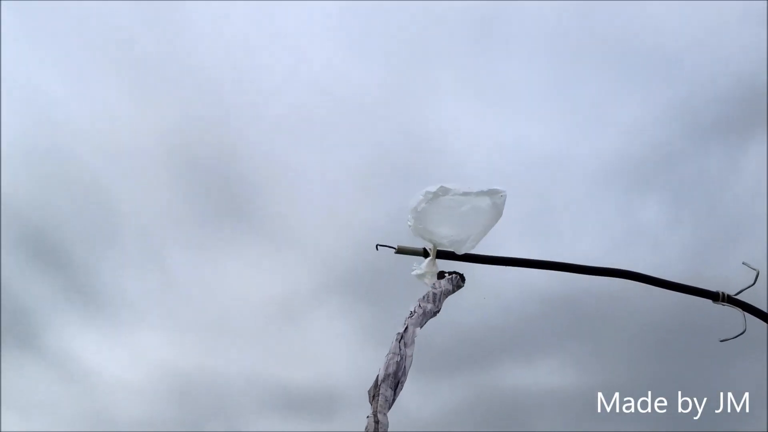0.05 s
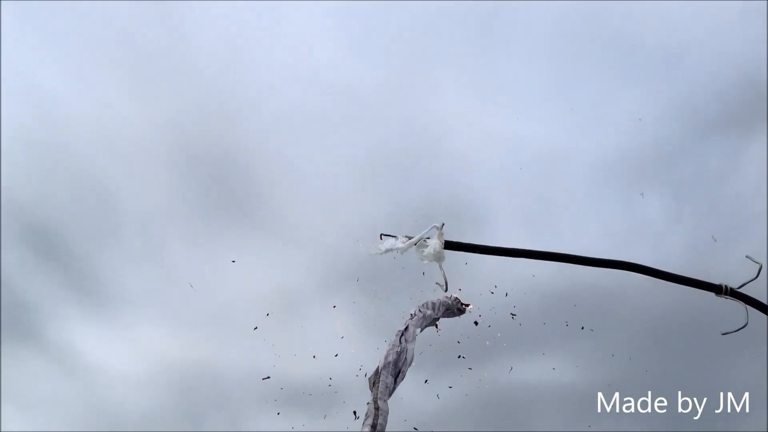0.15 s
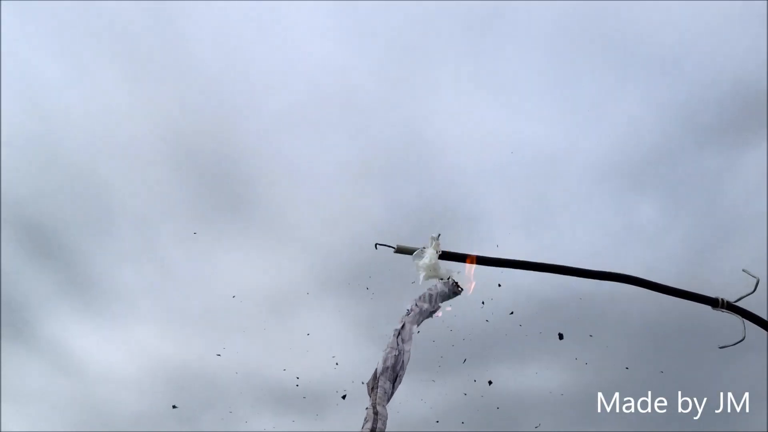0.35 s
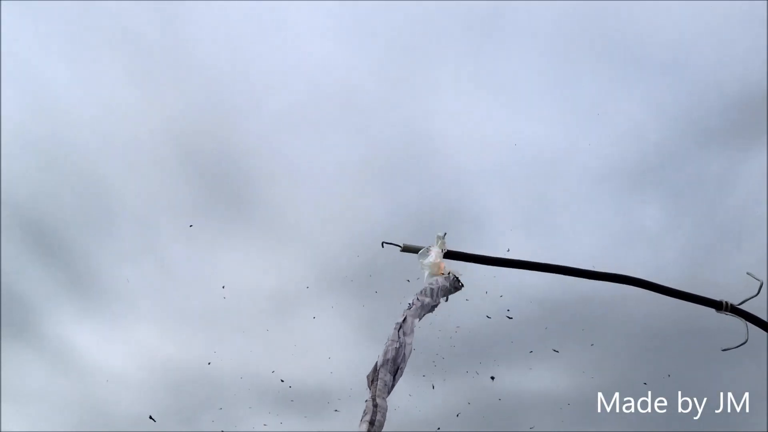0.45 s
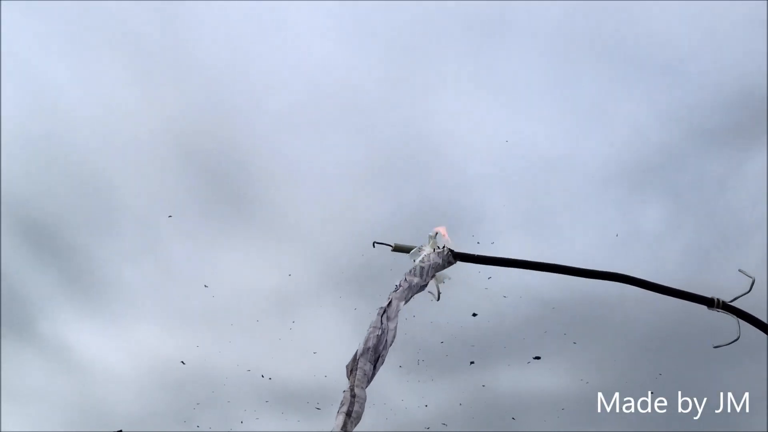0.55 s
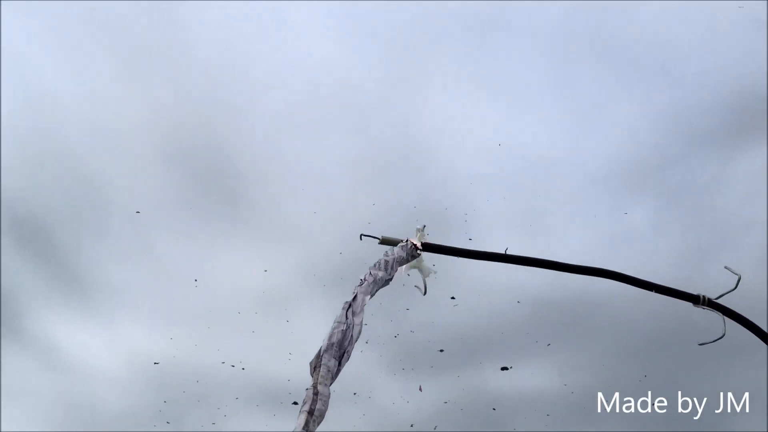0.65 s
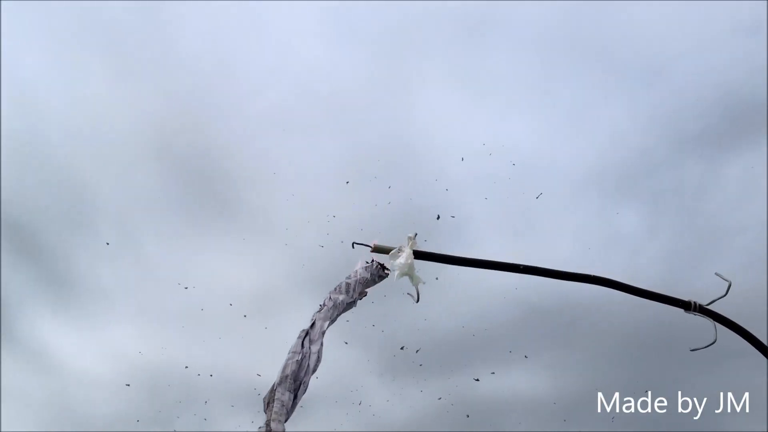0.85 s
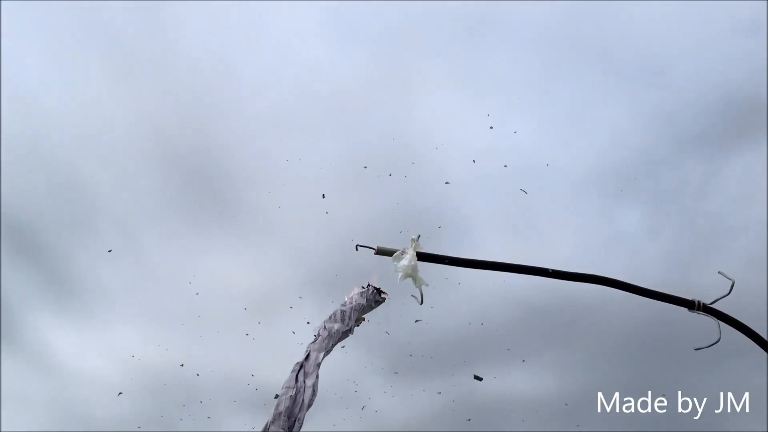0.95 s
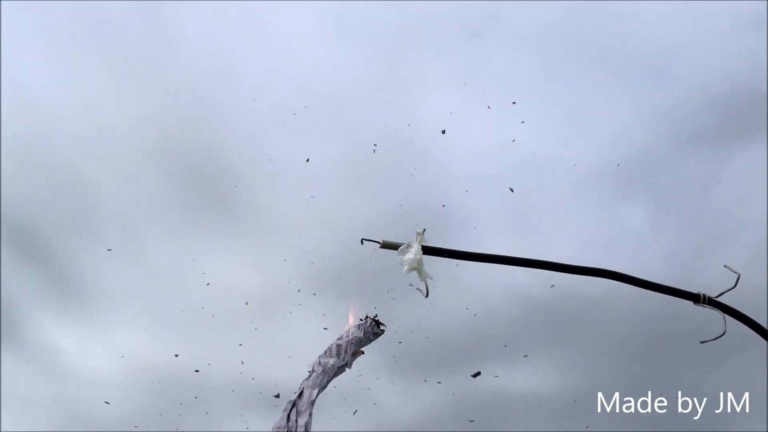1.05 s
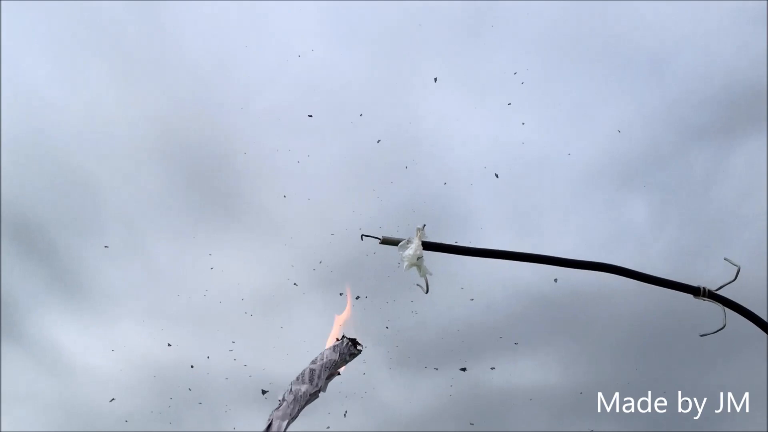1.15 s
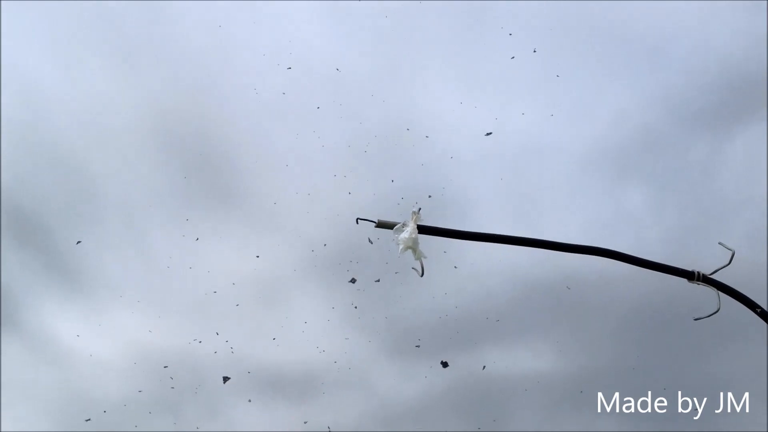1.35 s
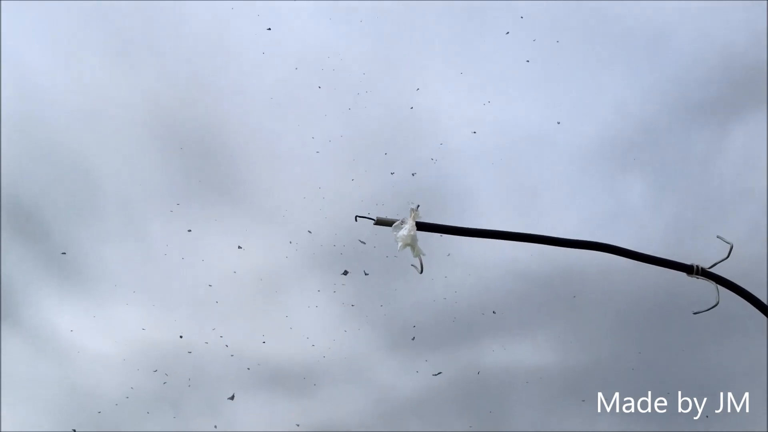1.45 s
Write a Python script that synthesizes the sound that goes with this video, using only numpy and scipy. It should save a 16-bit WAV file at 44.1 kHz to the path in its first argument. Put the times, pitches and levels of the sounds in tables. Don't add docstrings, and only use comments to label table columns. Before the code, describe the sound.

A gas balloon bursts with one very loud, sharp bang at 0.21 s, preceded by quiet torch hiss, ticks and airy puffs, the strongest knock near 0.10. Close reflections crowd the first 50 ms; a low thump follows at 0.37. Thin wall echoes flutter from 0.30 to 0.8, weakening over a diffuse rumble. Tiny metal tinks sound around 0.55-0.69 and 0.98; faint distant town hum remains. Boxy microphone, rounded peaks.

```python
import sys
import numpy as np
from scipy import signal
from scipy.io import wavfile
from scipy.ndimage import uniform_filter1d

SR = 44100
rng = np.random.default_rng(int(sys.argv[2]) if len(sys.argv) > 2 else 0)


def unload_wav(signal):
    wavfile.write(
        sys.argv[1],
        SR,
        np.round(np.clip(np.atleast_2d(signal).T, -1, 1) * 32767).astype(np.int16),
    )


def gain_from_db(level_db):
    decades = np.asarray(level_db, float) / 20
    return 10 ** decades


N = 66150
BURST_S = .2140


def band(x, hz, width):
    return signal.lfilter(*signal.iirpeak(min(hz, .45 * SR), hz / width, fs=SR), x)


def noise_band(hz, width):
    return unit(band(band(rng.standard_normal(N), hz, width), hz, width))


def cut(x, hz, kind, order=2):
    return signal.sosfilt(signal.butter(order, min(hz, .45 * SR), kind, fs=SR, output="sos"), x)


def unit(x):
    return x / np.sqrt(np.mean(x ** 2))


def walk(rate):
    k = int(SR / rate)
    steps = np.repeat(rng.standard_normal(N // k + 1), k)
    return unit(uniform_filter1d(uniform_filter1d(steps, k), k)[:N])


def fade(t, rise_s, fall_s):
    u = np.maximum(t, 0)
    return (1 - np.exp(-u / rise_s)) * np.exp(-u / fall_s)


def torch(t):
    # (time [s], level [dB], centre [Hz], length [s])
    puffs = [
        (.006, -74, 7000, .003),
        (.056, -57.5, 5300, .008),
        (.098, -62, 8000, .003),
        (.102, -49.5, 1850, .01),
        (.122, -54, 6000, .003),
        (.148, -55, 6950, .004),
        (.153, -54.5, 2500, .012),
        (.173, -83, 8000, .002),
        (.201, -60, 4980, .002),
        (1.395, -68, 5000, .003),
    ]
    level_db, centre_hz, flicker_db = -66.5, 3300, 1.5
    flicker = gain_from_db(level_db + flicker_db * walk(210))
    burning = np.clip((BURST_S - t) / .002, 0, 1)
    out = flicker * unit(band(rng.standard_normal(N), centre_hz, 7000)) * burning
    for s, db, hz, length_s in puffs:
        out = out + gain_from_db(db) * fade(t - s, .0008, length_s) * noise_band(hz, 2.6 * hz)
    return out


def air(t):
    # (frequency [Hz], level per third octave [dB])
    town = np.array([(40, -79.5), (100, -78), (220, -70), (600, -71), (1400, -81), (3000, -88.5),
                     (9000, -88.5), (14000, -84)])
    # (frequency [Hz], early level [dB], early t60 [s], late level [dB], late t60 [s])
    tail = np.array([(60, -37, 0.47, -52.5, .8), (150, -19.5, 0.27, -47.5, 1.67),
                     (300, -25.5, 0.55, -42.5, 1.58), (684.5, -24, 0.13, -47, 1.7),
                     (1500, -27.5, 0.14, -52, 1.46), (4000, -30, 0.083, -49, .8), (8000, -43, .2, -52, 0.4),
                     (14000, -54, 0.24, -60, 0.55)])
    rise_s, patchy_db, hum_before_db = .007, 1.2, 4.0
    since = t - BURST_S
    lumps = gain_from_db(patchy_db * walk(90))
    duck = gain_from_db(hum_before_db * np.clip(-since / .002, 0, 1))
    out = 0
    for hz in 40 * 2 ** (np.arange(27) / 3):
        early_db, early_t60, late_db, late_t60 = (
            np.interp(np.log(hz), np.log(tail[:, 0]), tail[:, k]) for k in range(1, 5))
        early = gain_from_db(early_db) * fade(since, rise_s, early_t60 / np.log(1000))
        late = gain_from_db(late_db) * fade(since, rise_s, late_t60 / np.log(1000))
        hum = gain_from_db(np.interp(np.log(hz), np.log(town[:, 0]), town[:, 1])) * duck
        level = np.hypot((early + late) * lumps, hum)
        level = level * gain_from_db(0.5 * walk(min(hz / 8, 30)))
        out = out + level * noise_band(hz, hz / 3)
    return out


def half_sine(u, length_s):
    return np.sin(np.pi * np.clip(u / length_s, 0, 1))


def blast(t):
    # (time [s], level [dB], length factor [1], tearing level [dB])
    arrivals = [(.2140, 1, 1.2, -1), (.2168, 4, 1.6, -10), (.2182, 2, .45, -5), (.2188, 5, .95, -12),
                (.2214, -10, 2.1, -10), (.2233, -6, .6, -12), (.2247, -4, 1.1, -13), (.2257, -9, .6, -20),
                (.2265, -8, 1.1, -30), (.2340, -14, 1.2, -22), (.2365, -14, 1.2, -22),
                (.2399, -8, 1.6, -20), (.2445, -9, 1.6, -20), (.2632, -9, 1.5, -20)]
    level_db, push_s, suck_s, suck_share = -4, .0008, .0016, .8
    tear_gain_db, tear_delay_s, tear_s = 3, .0007, .0009
    out = 0
    for s, db, stretch, tear_db in arrivals:
        u = t - s
        push = half_sine(u, push_s * stretch)
        suck = half_sine(u - push_s * stretch, suck_s * stretch)
        tear = rng.standard_normal(N) * fade(u - tear_delay_s * stretch, tear_s / 2, tear_s)
        out = out + gain_from_db(db) * (push - suck_share * suck) + gain_from_db(tear_db + tear_gain_db) * tear
    return gain_from_db(level_db) * cut(out, 9000, "low")


def rough_returns(t):
    # (peak time [s], level [dB], spread [s], centre [Hz])
    returns = [
        (0.241, -33, 0.002, 4200),
        (.261, -36.5, 0.0047, 4740),
        (0.268, -28.5, 0.014, 200),
        (0.334, -31, 0.002, 600),
        (0.368, -26, 0.0037, 238),
        (0.439, -38.5, 0.0017, 468),
        (0.549, -43, 0.016, 300),
        (1.215, -52.5, 0.0057, 500),
        (1.018, -57.5, 0.0015, 900),
    ]
    out = 0
    for s, db, spread_s, hz in returns:
        swell = np.exp(-.5 * ((t - s) / spread_s) ** 2)
        out = out + gain_from_db(db) * swell * noise_band(hz, 0.72 * hz)
    return out * (t > BURST_S)


def flutter(t):
    # (time [s], level [dB], bottom [Hz], top [Hz])
    echoes = [(0.2993, -27, 1000, 2380), (0.3112, -27, 1100, 8000), (0.3622, -30, 1140, 9000),
              (0.4113, -43, 1400, 8400), (.437, -46, 900, 2000), (0.4598, -43.5, 1500, 5640),
              (0.5124, -44, 1500, 4700), (0.5623, -57, 2500, 6540), (0.612, -56.5, 2550, 4400),
              (0.6612, -58, 3000, 4300), (0.7604, -65, 3000, 4360), (.810, -65, 3320, 6290)]
    level_db, rise_s, fall_s = -2.5, 0.00039, 0.0019
    trail_db, trail_s = -14, 0.0046
    out = 0
    for s, db, low_hz, high_hz in echoes:
        u = t - s
        trail = gain_from_db(trail_db) * fade(u + 0.0028, 0.00097, trail_s)
        crack = rng.standard_normal(N) * (fade(u, rise_s, fall_s) + trail)
        crack = cut(crack, 1800, "low", order=1)
        crack = cut(crack, low_hz, "high", order=3)
        crack = cut(crack, high_hz, "low", order=4)
        out = out + gain_from_db(db) * unit(crack)
    return gain_from_db(level_db) * out * np.sqrt(fall_s * SR / N)


def metal(t):
    # (time [s], level [dB], brightness [dB])
    tinks = [
        (.547, -67.5, 15.5),
        (0.5506, -61, -14),
        (0.647, -73.5, 14),
        (.687, -64.5, 1),
        (.9775, -67.5, 1.5),
    ]
    # (frequency [Hz], level [dB], t60 [s])
    modes = [(7070, -8, .11), (7550, -3, 0.15), (8200, -10, 0.034), (9640, -4.5, .07), (11400, -16, .05),
             (11860, -17, 0.038), (13100, -28, 0.044)]
    tap_db, tap_s, waver_db = -10, .003, 2.5
    out = 0
    for s, db, bright_db in tinks:
        u = t - s
        phase = rng.uniform(0, 2 * np.pi, len(modes))
        tap = fade(u, 0.00045, tap_s) * unit(band(rng.standard_normal(N), 6460, 6700))
        out = out + gain_from_db(db + bright_db + tap_db) * tap
        for k, (hz, mode_db, t60) in enumerate(modes):
            level = gain_from_db(db + mode_db + bright_db * (k > 1) + waver_db * walk(330))
            ring = fade(u, 0.00027, t60 / np.log(1000)) * np.sin(2 * np.pi * hz * t + phase[k])
            out = out + level * ring
    return out


def scene():
    t = np.arange(N) / SR
    return (torch(t) + air(t) + blast(t) + rough_returns(t) + flutter(t) + metal(t))[None]


def band_limit(x):
    return signal.sosfilt(signal.butter(12, 16530, fs=SR, output="sos"), x)


def record(dry):
    # (frequency [Hz], width [Hz], lift [dB])
    body = [(225, 90, 6.5), (361, 260, -9.5), (600, 190, 7), (900, 480, -3.5), (1270, 340, 7),
            (1685, 120, 1.5), (2100, 650, 3), (2517, 460, -7.5), (3630, 1100, 4), (4580, 320, 3.5),
            (6040, 410, 2.5), (7260, 1700, 4), (9850, 1700, -8), (13600, 3000, 2)]
    low_cut_hz, top_hz, ceiling = 120, 15350, .97
    x = cut(dry, low_cut_hz, "high", order=3)
    for hz, width, db in body:
        x = x + (gain_from_db(db) - 1) * band(x, hz, width)
    x = signal.sosfilt(signal.ellip(6, .2, 30, top_hz, fs=SR, output="sos"), x)
    x = ceiling * np.tanh(x / ceiling)
    return band_limit(x)


dry = scene()
out = record(dry)
unload_wav(out)
```